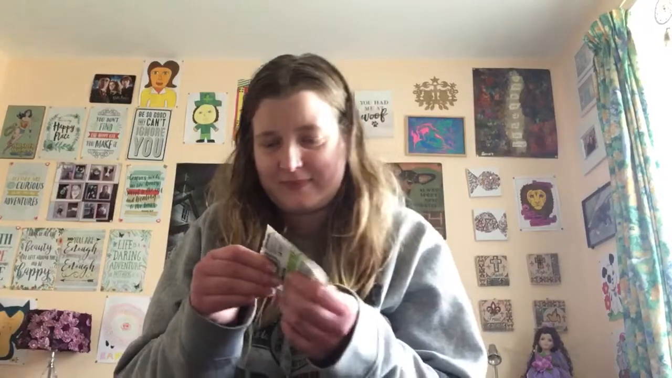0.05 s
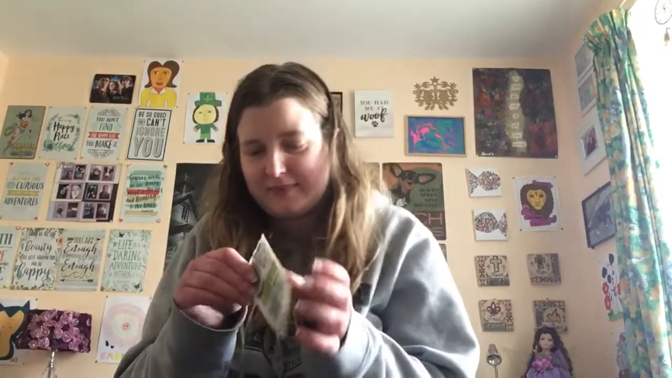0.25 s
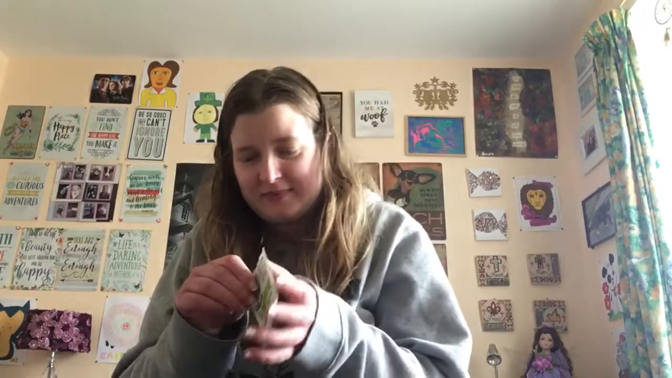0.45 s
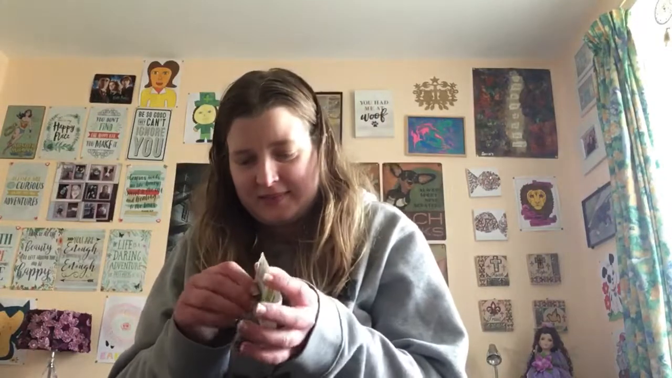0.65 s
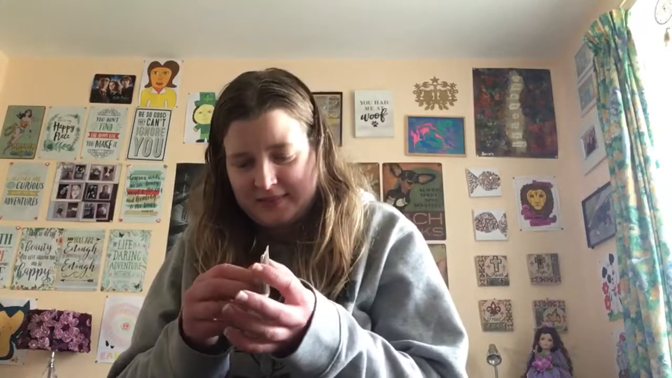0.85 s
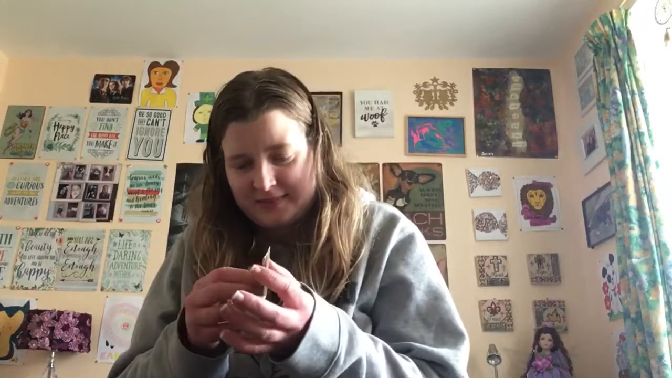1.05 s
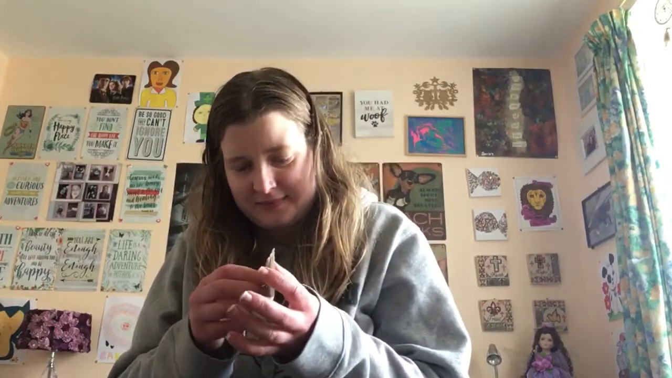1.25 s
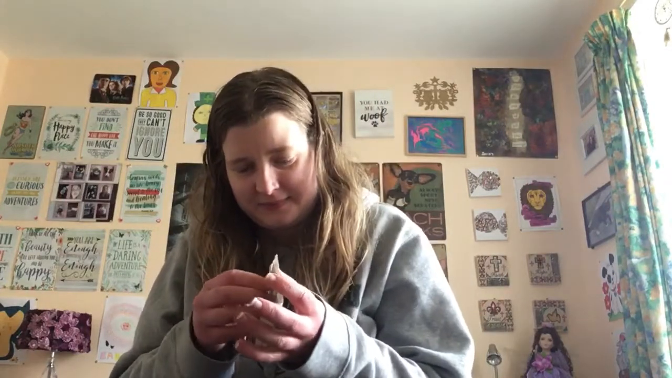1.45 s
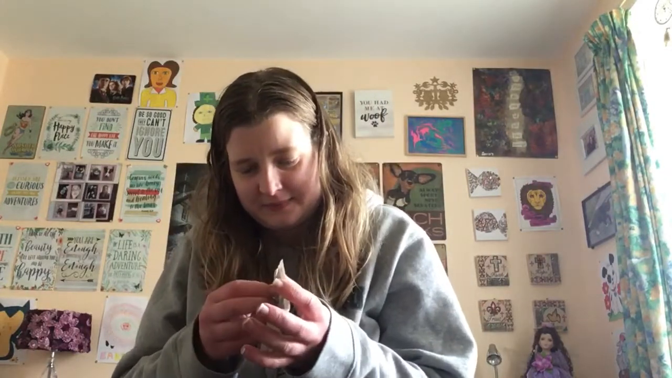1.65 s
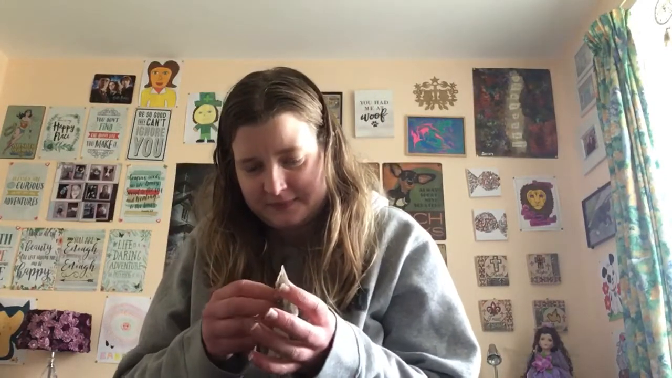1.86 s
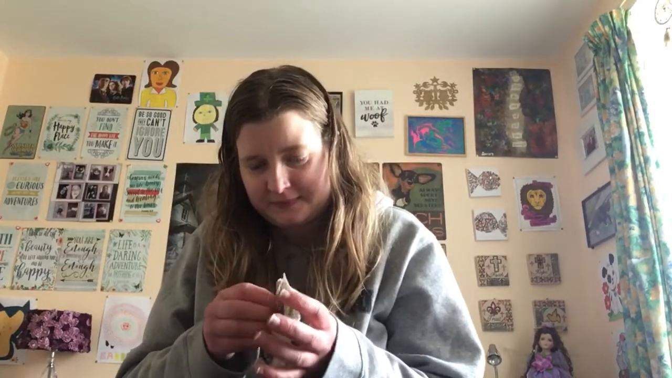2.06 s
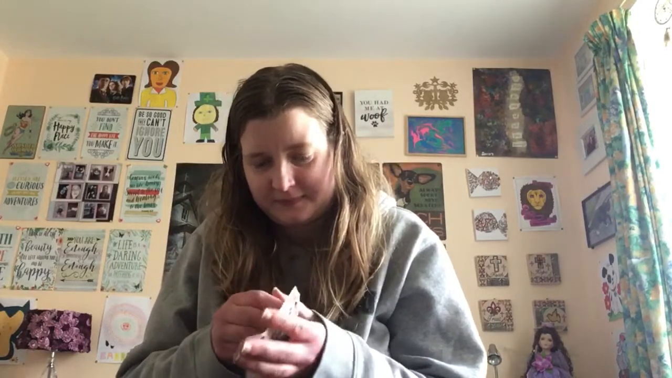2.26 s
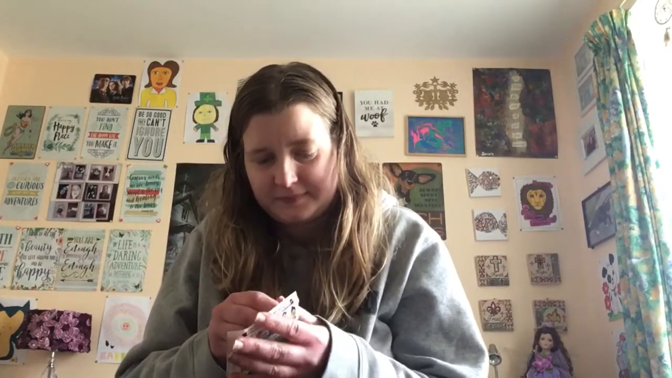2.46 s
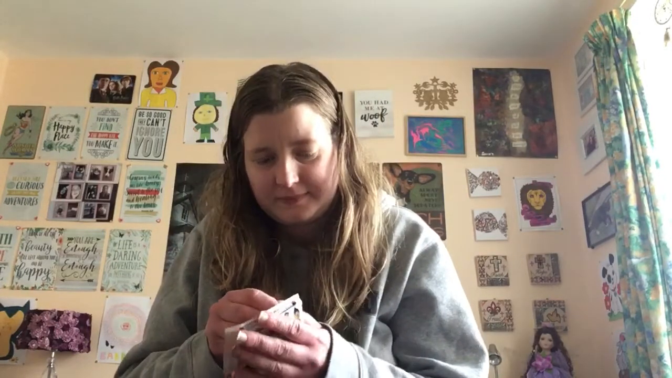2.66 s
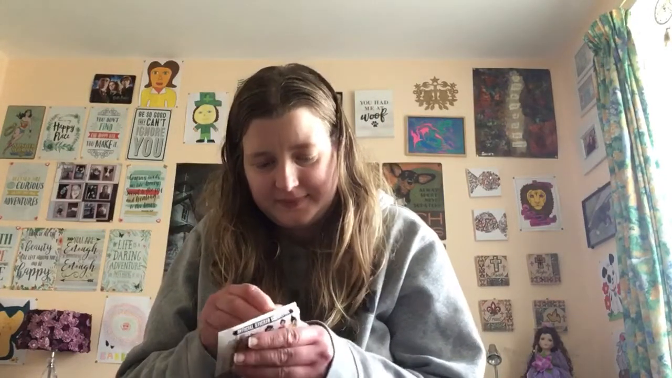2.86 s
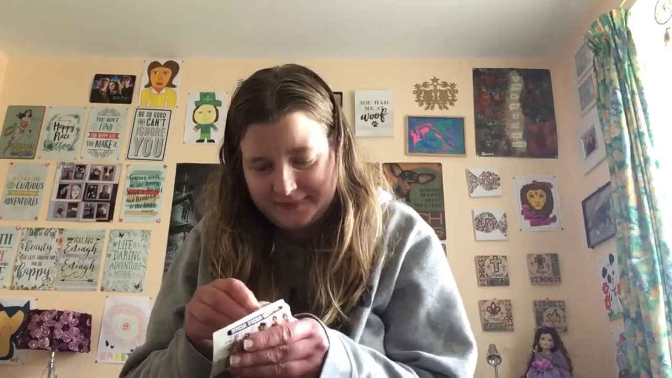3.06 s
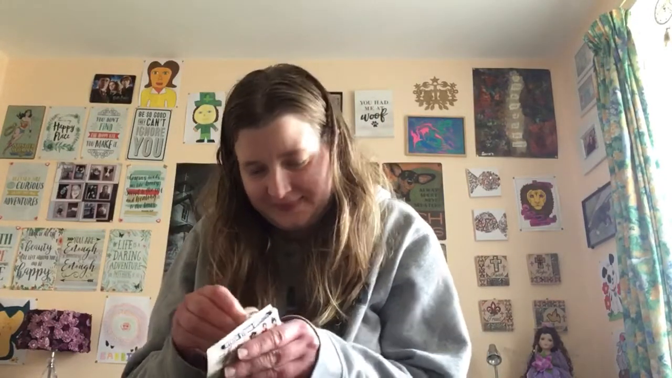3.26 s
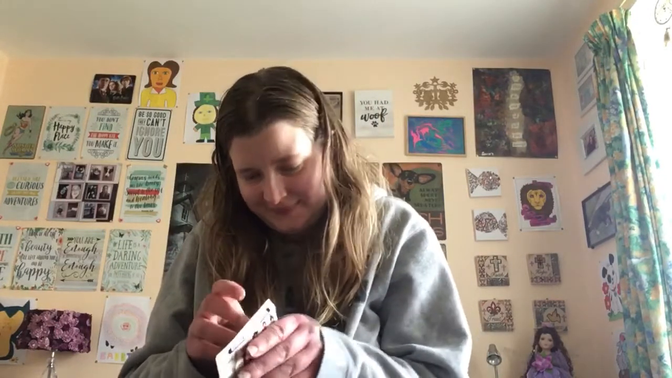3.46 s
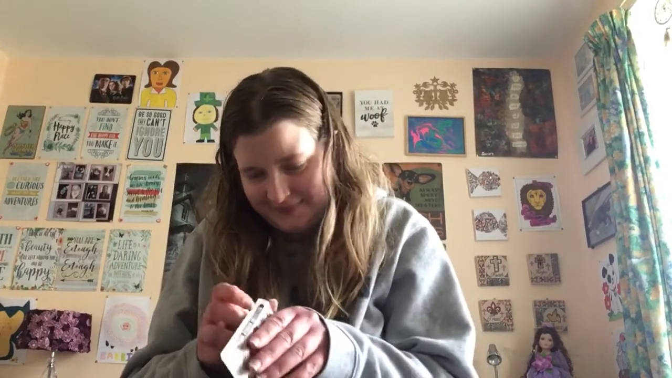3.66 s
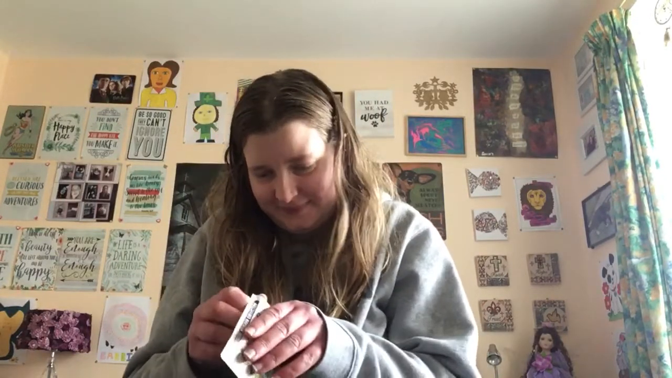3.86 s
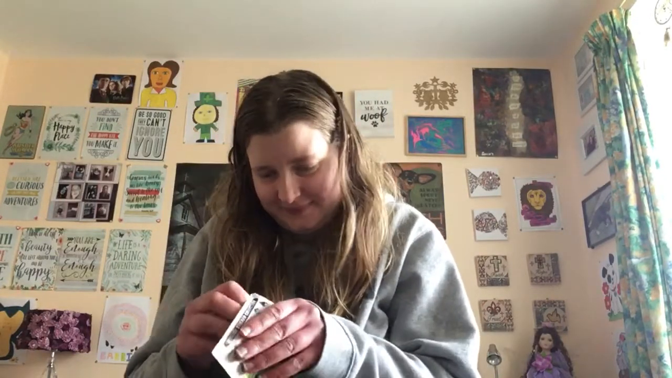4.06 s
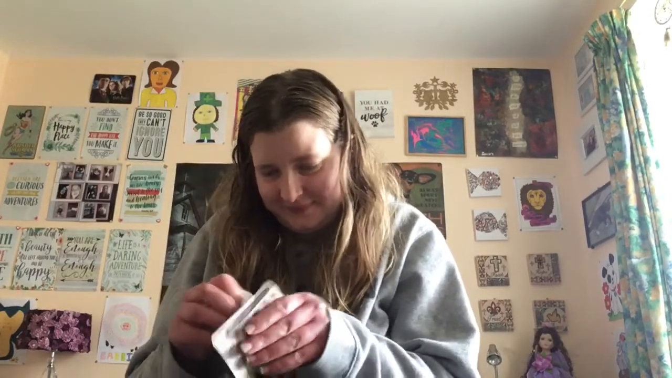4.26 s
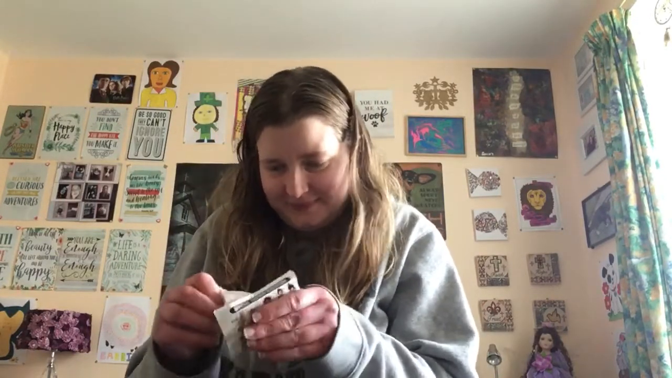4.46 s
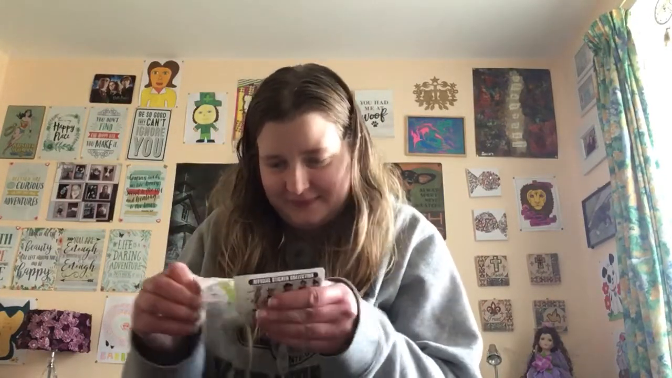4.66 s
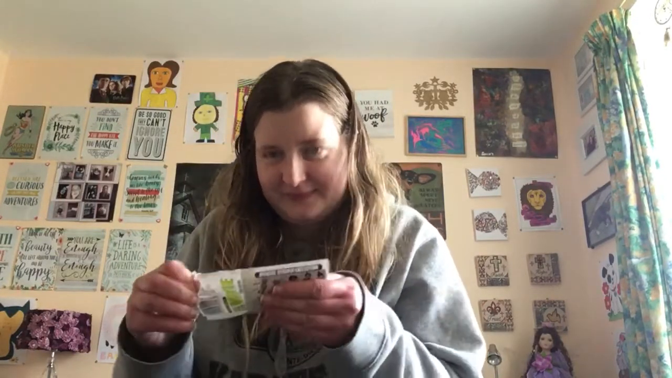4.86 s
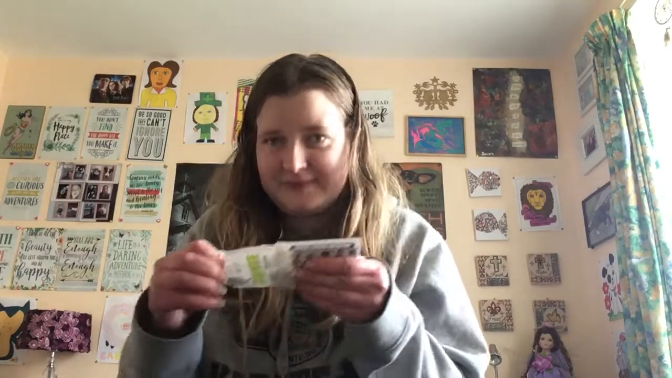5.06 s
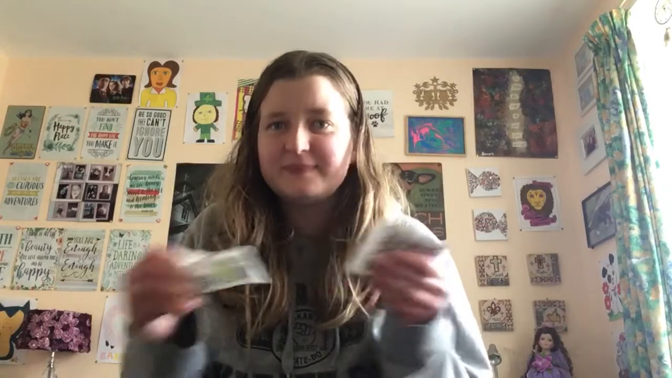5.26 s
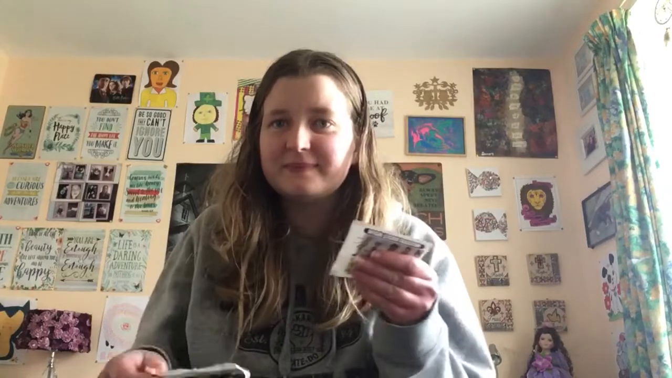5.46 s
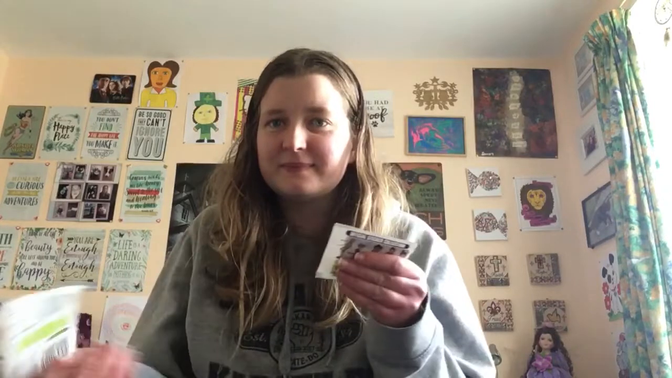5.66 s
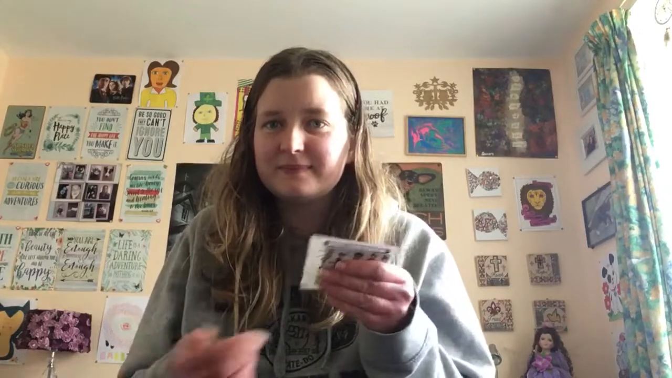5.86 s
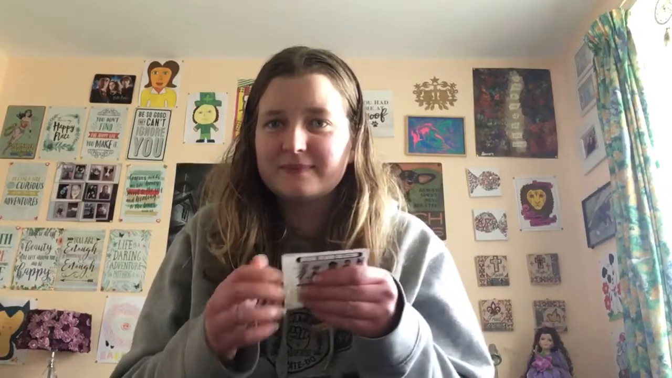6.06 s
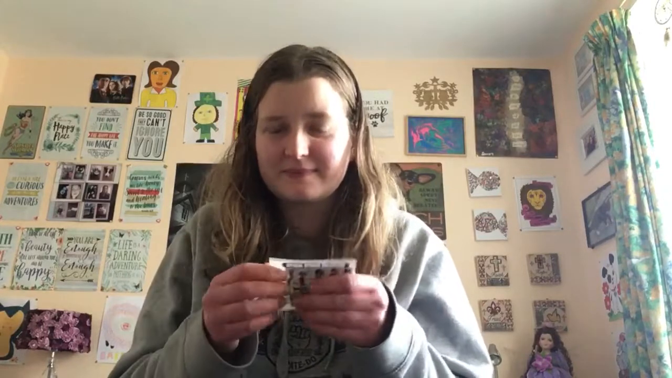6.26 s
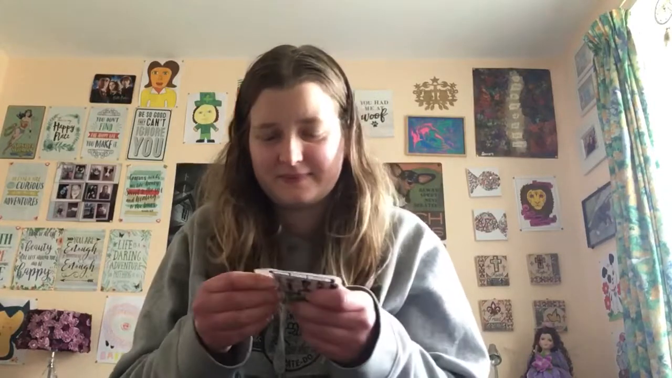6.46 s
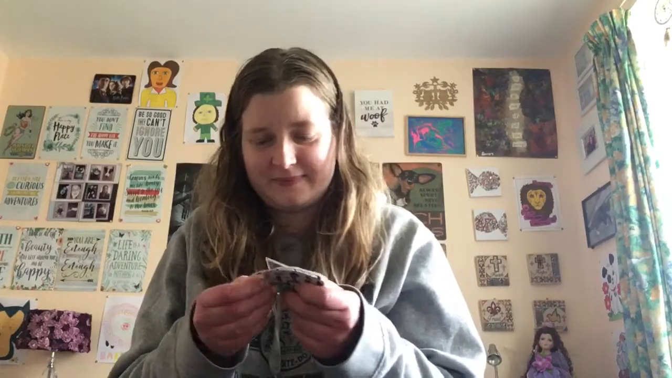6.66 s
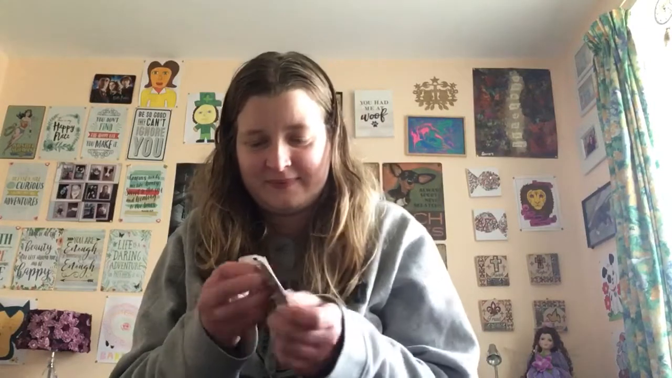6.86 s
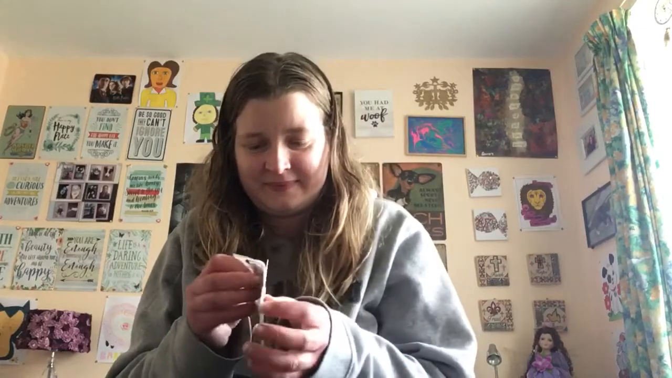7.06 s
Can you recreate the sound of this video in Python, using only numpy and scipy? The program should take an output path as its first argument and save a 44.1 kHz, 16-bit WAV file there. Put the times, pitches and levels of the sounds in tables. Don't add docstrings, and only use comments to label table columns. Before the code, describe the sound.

A quiet, small furnished room with low rumble and faint hiss; everything is close, with short wall reflections. From 0 to 0.6 s a crisp little packet is turned over with soft rustling and small snaps. Until about 2.5 s it is nearly still, with only sparse tiny ticks and very faint rubbing. From 2.5 to 4.2 s fingers pick at the seal: sharper, bright, dry snaps and short scratches, some with a soft hollow knock. At 4.2 s it rips: uneven bursts of dense crackle and hard cracks, strongest around 4.5 to 4.7 s, a slack gap, then a renewed pull and a last rip near 5.15 s. It falls away quickly. Around 5.5 s the wrapper is put aside with light ticks, with a small dull tap at 5.9 s. From 6.1 s the contents slide and click softly, ending with a bright snap at 7.0 s.

```python
import sys
import numpy as np
from scipy import signal
from scipy.fft import rfft, irfft
from scipy.io import wavfile
from scipy.ndimage import uniform_filter1d

SR = 44100
rng = np.random.default_rng(int(sys.argv[2]) if len(sys.argv) > 2 else 0)


def level_to_linear(level):
    exponent = np.asarray(level, float) / 20
    return 10 ** exponent


def store_wav(level_fs):
    pcm = np.round(np.clip(np.atleast_2d(level_fs), -1, 1) * 32767)
    wavfile.write(sys.argv[1], SR, pcm.T.astype(np.int16))


N = 313992

# low_hz, high_hz
BANDS_HZ = [(180, 700), (700, 3900), (3900, 10400), (10400, 15600)]
# low_hz, high_hz
SNAP_BANDS_HZ = [(330, 700), (700, 1800), (1800, 4000), (4900, 9200), (9500, 17000)]


def band(x, edges_hz):
    return signal.sosfilt(signal.butter(3, edges_hz, "band", fs=SR, output="sos"), x)


def rms_one(x):
    return x / np.sqrt(np.mean(x ** 2) + 1e-20)


def drift(rate_hz):
    r = np.exp(-2 * np.pi * rate_hz / SR)
    settled = signal.lfilter([1], [1, -2 * r, r * r], rng.standard_normal(N + SR))[SR:]
    return rms_one(settled)


def snaps():
    snap_decay_s = [0.0034, 0.0022, 0.0011, 0.00087, 0.00059]
    jump_strength, paths = 4.5, 3
    table, size = snap_levels(), 600
    t = np.arange(size) / SR
    shocks = rng.standard_normal((len(table), size))
    shocks[:, 0] = jump_strength * np.sign(shocks[:, 0])
    late = t - rng.uniform(0.00089, 0.0025, (len(table), 1))
    unit = np.sqrt(SR / 1000)
    direct, spread = np.zeros(N + size), np.zeros((paths, N + size))
    for k, (edges, decay) in enumerate(zip(SNAP_BANDS_HZ, snap_decay_s)):
        second_slip = (late > 0) * np.exp(-np.abs(late) / decay)
        envelope = np.exp(-t / decay) + 0.45 * second_slip
        bursts = band(shocks * envelope, edges)
        bursts *= unit / np.linalg.norm(bursts, axis=1, keepdims=True)
        jump = band(t == 0, edges)
        jump *= unit / np.linalg.norm(jump)
        for n, (burst, row) in enumerate(zip(bursts, table)):
            i = round(row[0] * SR)
            gain = level_to_linear(row[1 + k])
            direct[i:i + size] += gain * burst
            spread[n % paths, i:i + size] += gain * (0.8 * jump + 0.55 * burst)
    return direct[:N], spread[:, :N]


def snap_levels():
    # start_s, strength_db, pitch_oct (above 1 kHz), fall_db_per_oct
    turn_snaps = [(0.0051, -48, 1, 1.5), (0.0392, -44, 2.9, 6), (0.0606, -53, 4, 0), (0.1076, -43, 2, 6),
                  (0.1723, -39, 0.5, 9), (0.1958, -46.5, 4, 1), (0.274, -55, 1.4, 8), (0.306, -46, 1.4, 7),
                  (0.331, -48, 0, 2), (0.3707, -40, 1, 2), (0.6291, -55, 0.2, 5), (0.738, -45, 3, 7),
                  (0.9228, -36, 3.3, 5), (0.9384, -46, 2.5, 2), (1.0641, -43.5, 2.0, 9.5),
                  (1.1613, -51, 0.1, 11), (1.3163, -56, 5, 5), (1.7867, -54.5, 0.7, 3.5),
                  (1.8586, -50, 1.5, 4), (1.8981, -61, 4, 4), (1.9325, -46, 2, 6.5), (1.9496, -56, 2.8, 5),
                  (1.9754, -57, 1, 1), (2.0072, -41, 2.5, 2), (2.0986, -53, 0, 8), (2.4079, -51, 3, 9),
                  (2.4292, -47.5, 3, 7), (2.4489, -47.5, 2.6, 5.5), (2.4928, -45.5, 3.5, 6),
                  (2.503, -48.5, 2.8, 8)]
    pick_snaps = [(2.5732, -41, 1.5, 2), (2.5816, -40, 2, 4.5), (2.5975, -39, 0.4, 0.5),
                  (2.635, -27, 2.6, 3.5), (2.765, -47.5, 2, 5.5), (2.787, -43.5, 0.7, 9),
                  (2.8193, -32.5, 0.7, 2.5), (2.8765, -33, 3.5, 2), (3.0519, -52.5, 2.3, 10),
                  (3.086, -23, 3.3, 2.5), (3.1689, -37, 0.7, 7.5), (3.2441, -39.5, 0.9, 11),
                  (3.273, -41.5, -0.4, 6), (3.296, -41.5, 1.2, 4.5), (3.32, -40, 2.5, 2),
                  (3.326, -41, 1.5, 5.5), (3.4812, -32, -0.1, 2.5), (3.564, -27, 3.5, 3.5),
                  (3.679, -28, 0.5, 3.5), (3.7261, -33, 3.3, 4), (3.811, -40.5, -0.5, 8),
                  (3.827, -32, 2.5, 9), (3.84, -23.5, 3, 12.5), (3.8667, -35, 1, 1.5),
                  (3.9202, -28, 2.7, 11), (3.9509, -35, 3.5, 8), (4.0386, -48, 2, 5),
                  (4.0484, -40.5, 2.5, 12), (4.0875, -27, 2.5, 6.5), (4.142, -29.5, 2.5, 10.5)]
    tear_cracks = [(4.1888, -38.5, -1.2, 3), (4.2455, -22.5, 1, 5), (4.2495, -25, -0.5, 10),
                   (4.3585, -27.5, 2, 2.5), (4.4594, -22, 1, 7.5), (4.5966, -29, 0.2, 3.5),
                   (4.601, -26, 0, 6), (4.6661, -18.5, 3.5, 4.5), (4.7348, -28.5, -0.6, 3),
                   (4.799, -47, 3, 6), (4.823, -48, 2.8, 5), (4.8388, -29.5, -0.3, 6),
                   (4.8648, -27, 3, 1.5), (4.9662, -30, 2, 2), (5.0041, -41, 1.5, 1.5), (5.114, -29, 0, 6),
                   (5.1608, -27.5, 0.2, 2.5), (4.278, -31, 1, 3), (4.317, -30, 2, 3), (4.5125, -35, 0.5, 3),
                   (4.536, -33, 0.5, 2), (4.612, -28, 0.5, 5), (4.814, -50, 3, 8), (4.884, -38, 1.5, 2),
                   (5.074, -42, 0.3, 3), (5.093, -35, 1.3, 5), (5.142, -33, 2, 2),
                   (5.2777, -44.5, 1.6, 8.5)]
    sort_snaps = [(5.4284, -44.5, 2.5, 5), (5.548, -46, 2, 0.5), (5.5642, -41, 6.5, 1),
                  (5.5735, -38, 3.2, 5), (5.8955, -32.5, -3.5, 5.5), (5.9005, -32.5, 3.5, 3.5),
                  (6.0707, -48.5, -1.2, 4), (6.0786, -32.5, 0.67, 9), (6.0995, -48, 1.4, 7.5),
                  (6.1258, -47, -0.3, 6.5), (6.249, -39.5, 0, 15), (6.3159, -54, 3.5, 4),
                  (6.393, -36.5, -0.12, 8), (6.4419, -34, 1, 2), (6.5101, -30, 0.5, 7),
                  (6.5186, -30, 0.9, 9), (6.556, -45.5, 0.7, 5), (6.6076, -45.5, -0.4, 4.5),
                  (6.677, -50, -0.2, 6), (6.7008, -41.5, -0.5, 5), (6.7174, -30, 4, 3),
                  (6.7364, -32, 3.4, 7), (6.8524, -50, 1.3, 2), (6.9187, -46, 1.5, 3), (6.9497, -53, 2, 1),
                  (7.0178, -22, 2.8, 8), (7.0771, -46, 0.7, 9), (7.099, -43, 1.5, 5.5)]
    stray_snaps = [(0.029, -63, 3, -1), (2.977, -50, 0.39, 8), (3.645, -49, 0.3, 8), (5.578, -38, 3.2, 3),
                   (5.696, -60, 0.6, 4), (6.421, -48, 1.1, 9), (6.655, -54, 0.3, 10), (6.902, -61, 1.8, 4),
                   (7.006, -53, 1.8, 9), (5.399, -59, 2.5, 3), (6.273, -63, 3, 2), (5.711, -60, 1.5, 6),
                   (6.171, -63, 1.5, 3), (6.845, -54, 2, 6), (3.545, -50, 1.5, 4), (3.5, -46, 1.5, 3),
                   (3.712, -46, 0.7, 6), (3.603, -48, 0.5, 4), (3.129, -42, 2.5, 4), (5.524, -50, 2.6, 6),
                   (6.458, -48, 2.8, 6)]
    snap_band_db = [-6, -3.5, -2.5, 1, -2]
    events = np.vstack([turn_snaps, pick_snaps, tear_cracks, sort_snaps, stray_snaps, run_slips()])
    s, db, pitch, fall = events.T[:, :, None]
    octaves = np.log2(np.prod(SNAP_BANDS_HZ, axis=1) ** 0.5 / 1000)
    distance = np.abs(octaves - np.clip(pitch, -2, 4.5))
    return np.hstack([s, db + snap_band_db - np.abs(fall) * distance])


def run_slips():
    # start_s, length_s, strength_db, pitch_oct (above 1 kHz), fall_db_per_oct
    slip_runs = [
        (4.686, 0.006, -23, 1.8, 1.5),
        (4.918, 0.01, -35, 0, 0),
        (5.182, 0.012, -30, 1.5, 1.5),
        (5.511, 0.009, -50, 1.5, 2.5),
        (6.186, 0.007, -47, 0.3, 8),
        (4.226, 0.005, -30, 2, 2),
        (4.865, 0.004, -30, 3, 2),
        (0.369, 0.006, -41, 0, 3),
    ]
    slips = 6
    places = (np.arange(slips) + rng.random((len(slip_runs), slips))) / slips
    rows = []
    for (s, length, db, pitch, fall), row in zip(slip_runs, places):
        for p in row:
            swell_db = 20 * np.log10(np.sin(np.pi * p) + 0.1)
            rows.append((s + length * p, db + swell_db, pitch, fall))
    return rows


def rustle():
    fibres_per_s, fibre_spread_db, clump_db = 6000, 4.2, 1.8
    s, *levels_db = stroke_levels()
    t = np.arange(N) / SR
    clumps = level_to_linear(clump_db * drift(70))
    born = rng.random(N) < fibres_per_s / SR
    fibres = born * level_to_linear(fibre_spread_db * np.minimum(rng.exponential(1, N), 3.5)) * clumps
    edges = np.array(BANDS_HZ)
    density_db = np.transpose(levels_db) - 10 * np.log10(edges[:, 1] - edges[:, 0])
    density_db = density_db.T
    centres = np.log(edges).mean(axis=1)
    crackle = np.zeros(N)
    for hz in np.geomspace(310, 14800, 30):
        level_db = [np.interp(np.log(hz), centres, row) for row in density_db.T] + 10 * np.log10(hz)
        shaken = rng.choice([-1, 0, 0, 0, 0, 0, 0, 1], N)
        bend_db = 2.2 * drift(12)
        gain = level_to_linear(np.interp(t, s, level_db) + bend_db - 9.0)
        crackle += gain * rms_one(ring(fibres * shaken, hz))
    rumble = rms_one(band(rng.standard_normal(N), (45, 130)))
    return crackle, level_to_linear(np.interp(t, s, levels_db[0]) - 15) * rumble


def ring(clicks, hz):
    cycles = 15
    r, w = level_to_linear(-60 * hz / cycles / SR), 2 * np.pi * hz / SR
    return signal.lfilter([1, 0, -1], [1, -2 * r * np.cos(w), r * r], clicks + 1e-18)


def stroke_levels():
    # start_s, end_s, start_db, end_db, brightness_db_per_oct
    rubs = [(0.0, 0.105, -70.5, -61, 0.5), (0.111, 0.27, -55.5, -61, 1), (0.272, 0.412, -55, -53.5, 0.5),
            (0.412, 0.583, -57.5, -71.5, -0.5), (0.826, 1.11, -81.5, -85, 4), (2.36, 2.5, -84, -79, 5),
            (1.266, 1.334, -71, -78, -0.5), (1.82, 2.082, -76.5, -75.5, 2.5),
            (2.092, 2.193, -76.5, -72.5, 3.5), (2.229, 2.346, -67, -69, 3), (2.528, 2.612, -70, -55.5, 2.5),
            (2.64, 2.745, -60, -74, 1.5), (2.83, 2.988, -58, -75, 3.5), (3.031, 3.078, -79.5, -69.5, 5),
            (3.113, 3.192, -53, -66, 0.5), (3.267, 3.336, -64.5, -62, -1),
            (3.451, 3.547, -61.5, -63.5, 1.5), (3.566, 3.7, -53, -74.5, 2), (3.708, 3.896, -58.5, -59, 0),
            (3.918, 4.21, -64.5, -69, 1)]
    pulls = [
        (4.229, 4.341, -39.5, -37.5, -0.5),
        (4.36, 4.434, -52.5, -62, -1.5),
        (4.464, 4.526, -52, -36, 0),
        (4.542, 4.672, -35.5, -34.5, 0.3),
        (4.7, 4.847, -78, -64, 4.5),
        (4.867, 4.974, -60, -45, 1.5),
        (4.974, 5.08, -51.5, -55, 1),
        (5.088, 5.188, -43, -35.5, 1),
        (5.213, 5.28, -69, -80, 3),
    ]
    slides = [
        (5.317, 5.48, -76.5, -87, 3.5),
        (6.08, 6.33, -75, -85, 1),
        (6.594, 6.68, -69.5, -77, -5),
        (5.515, 5.595, -63.5, -59, 1),
        (5.607, 5.702, -80, -86.5, 9),
        (6.392, 6.603, -67, -76, -1),
        (6.694, 6.805, -62.5, -63, -1),
        (6.829, 6.954, -59, -66.5, -0.5),
        (6.976, 7.12, -70.5, -67, 1),
    ]
    rustle_band_db = [-9, -2.5, -2.5, -12]
    taut_band_db = [-2.5, 0.5, -1, 2.5]
    rise_db_per_s, fall_db_per_s = 896, 902
    s = np.arange(0, N / SR + 0.004, 0.004)
    octaves = np.log2(np.prod(BANDS_HZ, axis=1) ** 0.5 / 1650)[:, None]
    slack_db = np.array(rustle_band_db)[:, None]
    taut_db = np.add(rustle_band_db, taut_band_db)[:, None]
    power = 1e-11
    for strokes, colour_db in ([*rubs, *slides], slack_db), (pulls, taut_db):
        for start, end, start_db, end_db, bright in strokes:
            db = np.interp(s, [start, end], [start_db, end_db])
            db = db - rise_db_per_s * np.maximum(start - s, 0)
            db = db - fall_db_per_s * np.maximum(s - end, 0)
            power = power + level_to_linear(db + bright * octaves + colour_db) ** 2
    return [s, *(10 * np.log10(power))]


def folds():
    # start_s, end_s, level_db, start_hz, end_hz
    singing_folds = [(0.23, 0.45, -64, 2850, 2850), (0.45, 0.53, -70, 2850, 2850),
                     (0.11, 0.14, -67, 3400, 3200), (0.14, 0.16, -66, 1150, 1200),
                     (0.38, 0.4, -63, 1300, 1200), (3.1, 3.14, -64, 3300, 3300),
                     (3.25, 3.35, -69, 3200, 3200), (3.44, 3.53, -68, 3200, 3500),
                     (3.57, 3.595, -53, 3300, 3200), (3.73, 3.78, -65, 3400, 3200),
                     (3.845, 3.88, -58, 6000, 6500), (3.925, 3.96, -54, 6000, 6300),
                     (4.095, 4.12, -55, 4500, 4500), (4.255, 4.285, -46, 1600, 1500),
                     (4.315, 4.35, -47, 1400, 900), (4.29, 4.33, -51, 3000, 3200),
                     (4.36, 4.37, -47, 880, 880), (4.52, 4.56, -48, 1300, 1200),
                     (4.59, 4.655, -43, 1450, 1350), (4.575, 4.65, -49, 5800, 5800),
                     (4.97, 5.06, -63, 1150, 1150), (4.97, 4.99, -54, 3200, 3200),
                     (5.11, 5.165, -46, 1300, 950), (5.17, 5.19, -45, 1100, 2200),
                     (5.43, 5.46, -68, 4800, 4800), (6.53, 6.555, -62, 1700, 1500),
                     (6.59, 6.66, -72, 950, 1050), (6.845, 6.96, -69, 4300, 4300),
                     (7.025, 7.06, -58, 3500, 2800), (1.07, 1.1, -74, 2200, 2200),
                     (4.465, 4.5, -52, 2600, 2400), (5.91, 5.93, -62, 2200, 2200),
                     (6.45, 6.48, -62, 1600, 1600)]
    floor_hz, pitch_share, edge_s = 220, 0.04, 0.012
    ticks = rng.standard_normal((2, N)) * level_to_linear(3.0 * rng.exponential(1, N).clip(0, 3))
    out = np.zeros(N)
    for start, end, db, start_hz, end_hz in singing_folds:
        first = max(round((start - 0.05) * SR), 0)
        last = min(round((end + 0.05) * SR), N)
        t = np.arange(first, last) / SR
        r = np.exp(-np.pi * (floor_hz + pitch_share * start_hz) / SR)
        sway = rms_one(signal.lfilter([1], [1, -2 * r, r * r], ticks[:, first:last]))
        phase = 2 * np.pi * np.cumsum(np.interp(t, [start, end], [start_hz, end_hz])) / SR
        outside = np.maximum(np.maximum(start - t, t - end), 0)
        edge = np.exp(-(outside / edge_s) ** 2)
        out[first:last] += level_to_linear(db) * edge * (sway[0] * np.cos(phase) + sway[1] * np.sin(phase))
    return out


def pops():
    # start_s, peak_db, pitch_hz
    knocks_and_rings = [(0.24, -47, 320), (0.29, -47, 284), (0.37, -49, 260), (1.785, -57, 590),
                        (2.685, -51.5, 590), (2.844, -41, 540), (3.175, -51, 600), (3.76, -56, 500),
                        (3.79, -49.5, 590), (4.015, -51.5, 640), (5.13, -42, 210), (5.181, -47, 210),
                        (5.899, -54.5, 104), (5.897, -55, 270), (3.09, -45, 1130), (3.482, -46, 930),
                        (7.018, -33, 3500), (2.685, -50, 1100), (0.055, -60.5, 207), (6.92, -60.5, 232),
                        (6.128, -50.5, 590), (6.19, -46, 720), (6.25, -49.5, 580), (7.078, -57, 490),
                        (6.32, -58, 330), (4.805, -48, 410), (4.9, -43, 420), (4.32, -40, 520), (2.82, -35, 1180),
                        (5.52, -47, 1220), (0.172, -42, 2150), (0.629, -58, 1550), (0.273, -47, 330),
                        (0.375, -46, 600), (0.306, -50, 2900), (3.679, -34, 1750), (3.481, -40, 1700),
                        (3.564, -34, 3400), (3.84, -32, 7000), (3.92, -28, 6800), (4.0875, -30, 6500),
                        (4.142, -32, 6500), (6.25, -48, 2300), (6.08, -46, 2500), (3.726, -36, 8200),
                        (3.867, -42, 1200), (6.51, -36, 1600), (6.519, -36, 1700), (6.079, -44, 1700),
                        (6.442, -40, 2300), (6.717, -42, 4000), (7.018, -38, 2250), (5.693, -62, 1450),
                        (6.902, -56, 4100), (3.086, -30, 7500), (4.966, -33, 3100), (4.46, -30, 3000),
                        (4.839, -40, 1500)]
    rise_cycles, t60_cycles = 0.67, 32
    out = np.zeros(N + SR)
    for s, db, hz in knocks_and_rings:
        cycles = np.arange(SR // 4) / SR * hz
        shape = (1 - np.exp(-cycles / rise_cycles)) * level_to_linear(db - 60 * cycles / t60_cycles)
        i = round(s * SR)
        out[i:i + SR // 4] += shape * np.sin(2 * np.pi * cycles)
    return out[:N]


def room(x):
    # delay_s, level_db
    wall_echoes = [
        (.0077, -11),
        (.0190, -19),
        (.0275, -20),
    ]
    # level_db, t60_s
    diffuse_tail = [(-3.5, 0.18), (-8, 0.21), (-6, .2), (-3.5, 0.15)]
    t = np.arange(SR // 2) / SR
    response = np.zeros(len(t))
    smear = rng.standard_normal((len(wall_echoes), 120)) * np.exp(-np.arange(120) / 40)
    for (s, db), shape in zip(wall_echoes, smear):
        i = round(s * SR)
        response[i:i + 120] += level_to_linear(db) * shape / np.linalg.norm(shape)
    scatter = rng.standard_normal(len(t))
    for (db, t60), edges in zip(diffuse_tail, BANDS_HZ):
        fade = level_to_linear(-60 * t / t60) * np.clip((t - 0.003) / 0.0053, 0, 1)
        response += level_to_linear(db) * band(scatter, edges) * fade / np.linalg.norm(fade)
    return signal.fftconvolve(x, response)[:N]


def microphone(x):
    # centre_hz, width_hz, gain_db
    colour = [(718, 74, -9), (1240, 950, 3.5), (3040, 1700, 2.5), (3950, 210, -5), (4855, 400, -5),
              (4400, 700, -0.8), (10460, 480, -7), (17100, 14000, -13)]
    for hz, width_hz, db in colour:
        w, g = 2 * np.pi * hz / SR, level_to_linear(db / 2)
        a = np.sin(w) * width_hz / hz / 2
        x = signal.lfilter([1 + a * g, -2 * np.cos(w), 1 - a * g], [1 + a / g, -2 * np.cos(w), 1 - a / g], x)
    return x


def hush():
    # frequency_hz, level_db (per Hz)
    density = np.array([(20, -21), (55, 5), (113, 0), (200, -4.5), (400, -13), (1300, -14.5), (2000, -20.5),
                        (3000, -20), (5000, -26), (11400, -27), (16000, -37.5)])
    hz = np.fft.rfftfreq(N, 1 / SR) + 1
    shape = level_to_linear(np.interp(np.log(hz), np.log(density[:, 0]), density[:, 1]))
    return level_to_linear(-67.5) * rms_one(irfft(rfft(rng.standard_normal(N)) * shape, N))


def scene():
    crackle, rumble = rustle()
    direct, spread = snaps()
    crackle = crackle + folds()
    reflected = level_to_linear(-1.5) * room(crackle) + sum(room(path) for path in spread)
    heard = microphone(direct + crackle + pops() + reflected)
    return (heard + rumble + hush())[None]


def low_pass(x):
    return signal.sosfilt(signal.butter(12, 16980, fs=SR, output="sos"), x)


def record(dry):
    cutoff_hz, attack_cutoff_hz = 16000, 16900
    low, high = (signal.sosfiltfilt(signal.cheby2(14, 40, hz, fs=SR, output="sos"), dry)
                 for hz in (cutoff_hz, attack_cutoff_hz))
    power = signal.sosfilt(signal.butter(2, 5000, "high", fs=SR, output="sos"), dry) ** 2
    sudden = uniform_filter1d(power, 130) > 4 * uniform_filter1d(power, 1300)
    share = np.clip(3 * uniform_filter1d(sudden * 1., 400), 0, 1)
    return low_pass(low + share * (high - low))


dry = scene()
out = record(dry)
store_wav(out)
```